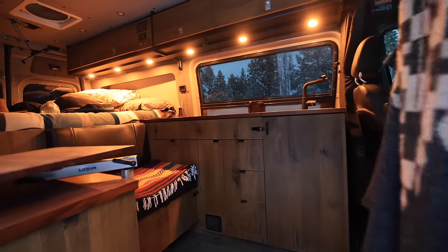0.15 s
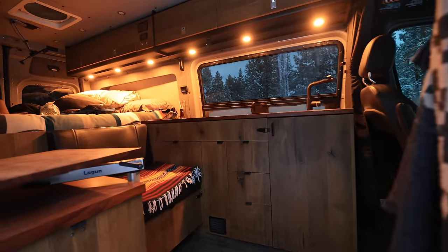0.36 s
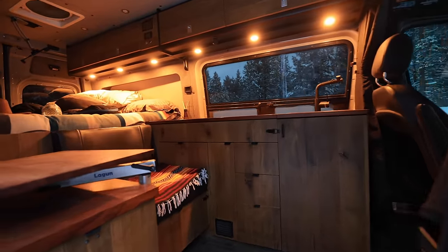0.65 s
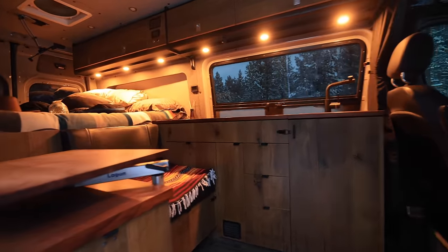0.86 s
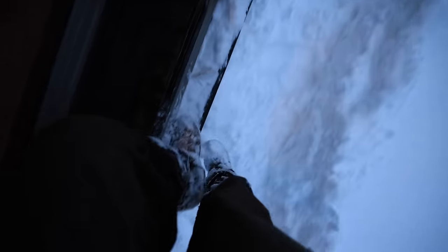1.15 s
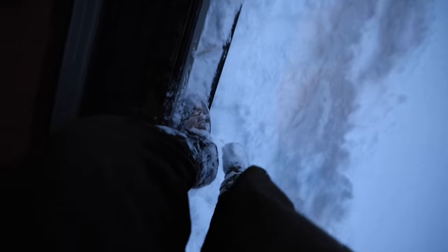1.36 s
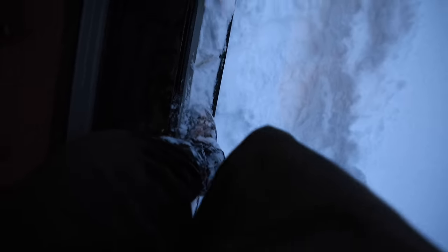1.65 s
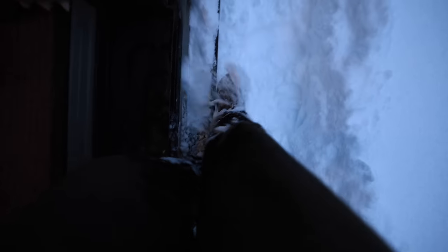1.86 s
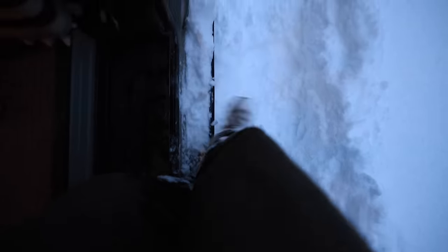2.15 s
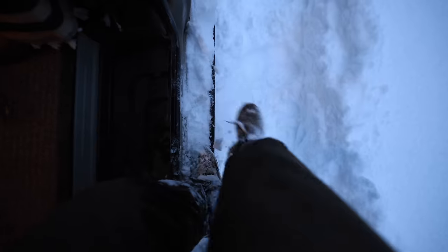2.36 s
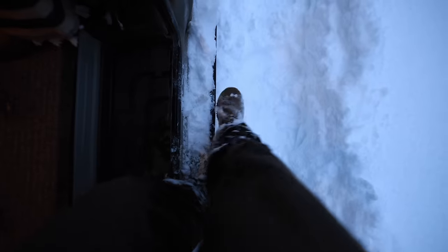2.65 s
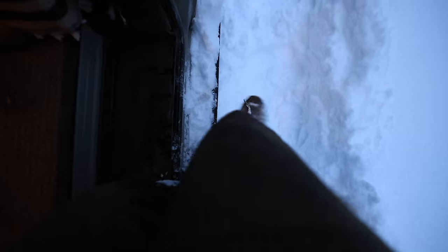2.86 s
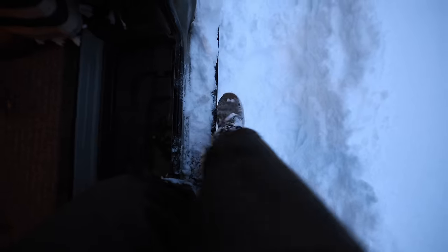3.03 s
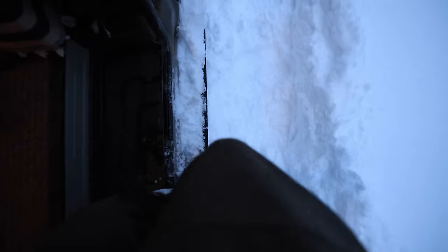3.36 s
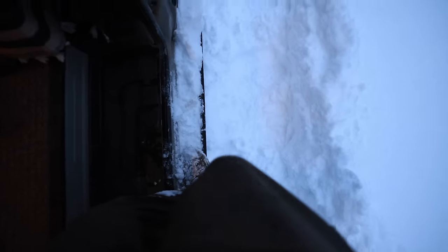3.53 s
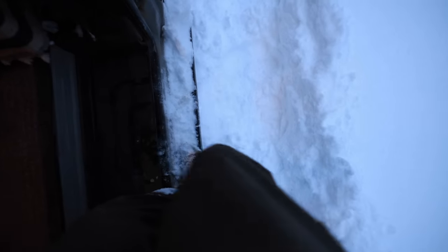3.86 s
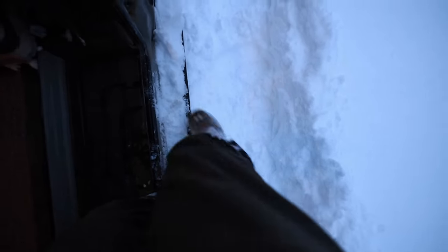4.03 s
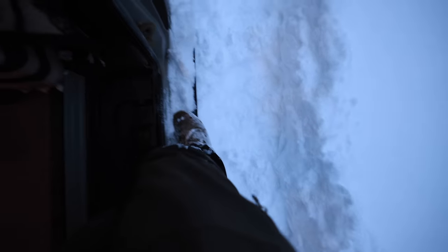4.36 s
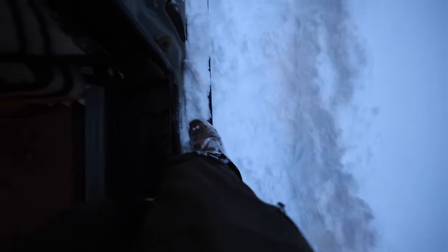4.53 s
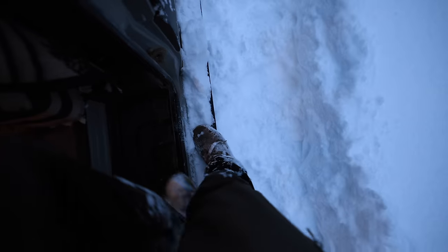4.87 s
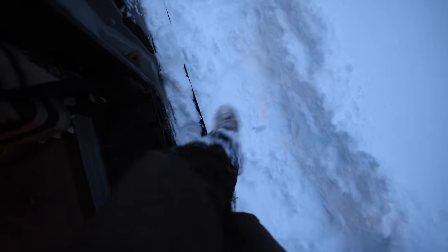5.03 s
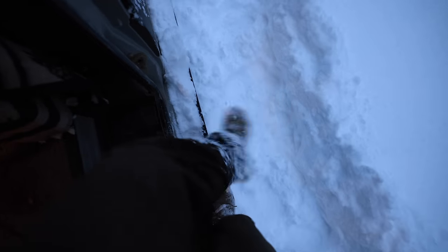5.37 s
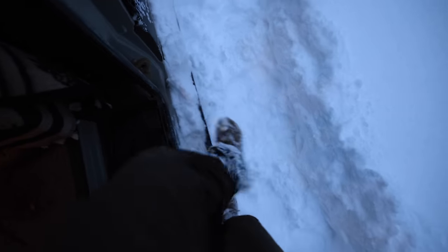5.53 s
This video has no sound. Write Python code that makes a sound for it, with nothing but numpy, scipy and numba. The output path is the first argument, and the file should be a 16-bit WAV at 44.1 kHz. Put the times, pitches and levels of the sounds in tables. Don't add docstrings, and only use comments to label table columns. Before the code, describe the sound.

Close up, heavy boots bang snow off a hollow metal van step, with cloth rustle, snowy scrapes, rapid stamps and low wind buffeting.

```python
import sys
import numpy as np
from scipy import signal
from scipy.fft import rfft, irfft
from scipy.io import wavfile
from scipy.ndimage import uniform_filter1d
from numba import njit

SR = 44100
rng = np.random.default_rng(int(sys.argv[2]) if len(sys.argv) > 2 else 0)


def invert_db(level):
    return 10 ** (np.asarray(level, dtype=float) / 20)


def pcm_store(signal):
    levels = np.round(np.clip(np.atleast_2d(signal), -1, 1) * 32767)
    wavfile.write(sys.argv[1], SR, levels.astype(np.int16).T)


N = 251370


def level(x, db):
    return x * invert_db(db) / np.sqrt(np.mean(x ** 2))


def colour(x, table):
    hz, db = np.transpose(table)
    bins_hz = np.arange(513) * SR / 1024
    log_gain = np.interp(np.log(bins_hz + 1), np.log(hz), db) * np.log(10) / 20
    cepstrum = irfft(log_gain)
    cepstrum[1:512] *= 2
    cepstrum[513:] = 0
    return signal.fftconvolve(x, irfft(np.exp(rfft(cepstrum))))[:len(x)]


def band(x, lo_hz, hi_hz):
    return signal.sosfilt(signal.butter(2, [lo_hz, hi_hz], "bandpass", fs=SR, output="sos"), x)


def walk(rate):
    hold = int(SR / rate)
    steps = np.repeat(rng.standard_normal(N // hold + 1), hold)
    smooth = uniform_filter1d(uniform_filter1d(steps, hold), hold)[:N]
    return smooth / smooth.std()


def add(out, s, x):
    i = int(s * SR)
    out[i:i + len(x)] += x[:N - i]


def blows(table, modes, tone, contact_ms, bounce_db, scatter_db, spread, swell_s, crack_s, spray_s, spray_db,
          lag_s=0):
    out, t = np.zeros(N), np.arange(SR // 3) / SR
    hz, db, t60 = np.transpose(modes)[:, :, None]
    deep, upper = hz < 150, hz > 520
    push = np.hanning(int(contact_ms * SR / 1000) + 3)
    push = np.convolve(push, np.r_[1, np.zeros(int(0.0047 * SR)), invert_db(bounce_db)])
    for s, blow_db, crack_db, deep_db, upper_db, damping in table:
        spot, detune, turn = rng.standard_normal((3, len(modes), 1))
        gain = invert_db(db + deep * deep_db + upper * upper_db + scatter_db * spot * ~deep)
        quick = max(damping, 0.2) * np.where(upper, 1.4, 1)
        fade = 1000. ** (-t * quick / t60)
        swell = 1 - np.exp(-t * hz / 200 / swell_s)
        wave = np.sin(2 * np.pi * hz * (1 + 0.0173 * detune) * t + spread * turn)
        ring = (gain * swell * fade * wave).sum(0)
        ring = band(signal.fftconvolve(ring, push), 80, 6000)
        add(out, s + lag_s, -invert_db(blow_db) * ring / abs(ring).max())

        hiss = rng.standard_normal(SR // 10)
        u = t[:len(hiss)]
        onset = 1 - np.exp(-u / 0.00083)
        decay = np.exp(-(u / crack_s) ** 2) + invert_db(spray_db) * np.exp(-u / spray_s)
        crack = colour(hiss * onset * decay, tone)
        add(out, s, invert_db(crack_db + 7.5) * crack / abs(crack).max())
    return out


# start_s, blow_db, crack_db, deep_panels_db, upper_modes_db (last two relative)
KICK_EVENTS = [
    (1.857, 3, -3.5, -8, -33),
    (2.246, 4.5, -8, -12, -5),
    (2.622, 3.5, -0.5, -31, -23),
    (2.978, 1.5, -3, -14, -44),
    (5.467, 3, -6, -14, -8),
]
# pitch_hz, level_db, t60_s
SILL_PANELS = [(92.5, -2.5, 0.46), (119.6, -11, 0.9), (152, 0.5, 0.06), (196.2, -12.5, 0.15),
               (217, -7, 0.059), (236.6, -11, 0.25), (261, -6, 0.15), (292, -3, 0.15), (305.5, -6.5, 0.11),
               (334.6, -8, 0.21), (208, 2, 0.024), (495, -2.5, 0.034), (560, 4.5, 0.027), (730, 13, 0.0065),
               (1092, -8, 0.073), (384, -4, 0.06)]
# frequency_hz, density_db
CRACK_TONE = [(300, -12), (800, 4), (2000, -1.5), (4000, -18.5), (8000, -25.5), (15000, -47)]


def kicks():
    toe = [(*kick, 0.75) for kick in KICK_EVENTS]
    return blows(toe, SILL_PANELS, CRACK_TONE, contact_ms=0.93, bounce_db=-2.5, scatter_db=1.5, spread=0.31,
                 swell_s=0.000057, crack_s=0.0015, spray_s=0.015, spray_db=-39, lag_s=0.0012)


# start_s, blow_db, crack_db, deep_panels_db (relative), damping_factor
THUD_EVENTS = [
    (0.391, -20, -53, -3, 1),
    (0.439, -17.5, -52, -6, 1.7),
    (0.549, -21, -50, -14, 1.4),
    (0.676, -26.5, -32, -11, 0.67),
    (1.307, -24.5, -35, -8, 2.6),
    (1.628, -27, -32.5, -9.5, 2.6),
    (2.222, -8, -24, 4.5, 0.86),
    (2.59, 1, -19.5, 2.5, 2.3),
    (2.596, -3, -23, 0, 1.17),
    (2.966, -0.5, -28, -4, 2.8),
]
# pitch_hz, level_db, t60_s
STEP_MODES = [(98.5, 10, 0.28), (125.2, 11.5, 0.22), (169.6, 2, 0.23), (226.8, 1, 0.29), (274, 2.5, 0.058),
              (346, -6.5, 0.15), (442, -14.5, 0.17), (542, 4.5, 0.073), (750, 9.5, 0.042), (950, -5, 0.15),
              (1190, -2.5, 0.11), (1500, -14, 0.07)]
# frequency_hz, density_db
SCUFF_TONE = [(300, 9), (800, -3), (2000, -6), (3500, -10.5), (5000, -23), (15000, -43)]


def thuds():
    sole = []
    for s, blow_db, crack_db, deep_db, damping in THUD_EVENTS:
        upper_db = -1.5 + 0.54 * (crack_db - blow_db)
        sole.append((s, blow_db, crack_db, deep_db, upper_db, damping))
    return blows(sole, STEP_MODES, SCUFF_TONE, contact_ms=0.5, bounce_db=-30, scatter_db=3.85, spread=3.13,
                 swell_s=0.0042, crack_s=0.0093, spray_s=0.027, spray_db=-16)


# start_s, blow_db, crack_db, upper_modes_db (relative), damping_factor
STAMP_EVENTS = [(3.449, -5.5, -24, 0, 1.2), (3.467, -8.5, -47, -22, 1.3), (3.487, -11, -41, -20, 0.77),
                (3.631, -11.5, -39, -11, 1.2), (3.68, -7.5, -28, -9.5, 1.36), (3.686, -4, -42, -9, 1.4),
                (3.716, -10.5, -45, -14, 1.1), (3.733, -18, -44, -23, 0.76), (5.075, -7, -35, -20, 1.3),
                (5.091, -11, -35, -20, 1.4), (5.1095, 1, -28, 0, 1.13), (5.127, 1.5, -33, -7, 1.8),
                (5.136, -3, -43, -23, 1.5), (5.155, -6.5, -42, -23, 1.2), (5.176, -16, -32, -15, 1.7),
                (5.2, -16.5, -28.5, -4, 1.1), (5.225, -27, -38, -12, 1.6), (5.258, -19, -34, -7, 2.6)]
# pitch_hz, level_db, t60_s
FLOOR_MODES = [(100.2, -0.5, 0.19), (129.6, 3.5, 0.12), (163.7, 0.5, 0.16), (201.4, 3, 0.11), (238, 1, .22),
               (283, -2.5, 0.097), (346, -5, 0.098), (445, -10, 0.055), (563, -5.5, 0.063),
               (683, 1.5, 0.037), (910, -9, 0.04), (1160, -8, 0.056)]


def stamps():
    boots = [(s, blow_db, crack_db, 0, upper_db, damping)
             for s, blow_db, crack_db, upper_db, damping in STAMP_EVENTS]
    return blows(boots, FLOOR_MODES, SCUFF_TONE, contact_ms=0.57, bounce_db=-27, scatter_db=1.4, spread=1.56,
                 swell_s=0.0016, crack_s=0.012, spray_s=0.03, spray_db=-12)


# start_s, blow_db, crack_db, upper_modes_db (relative), damping_factor
KNOCK_EVENTS = [(0.109, -13, -43, -30, 0.5), (4.241, -14.5, -29.5, -17, 0.39), (4.29, -15, -28, -25, 0.98),
                (4.311, -15, -30, -8, 1.1), (4.32, -10.5, -53, -16, 2.1), (4.342, -8, -28.5, -7, 0.87),
                (4.357, -14, -44, -19, 0.56), (4.454, -8, -30, 9, 0.72), (4.458, -3.5, -46, -5, 1.3),
                (4.467, -2, -34, -15, 1.2), (4.475, -5.5, -53, -24, 0.65)]
# pitch_hz, level_db, t60_s
TRIM_MODES = [(98, 16.5, 0.056), (200.4, -8.5, 0.11), (239, -1, 0.066), (295.4, 1.5, 0.048),
              (325, 2.5, 0.074), (418, -8, 0.046), (575, 1.5, 0.085), (720, 4, 0.053), (830, -1, 0.062),
              (1150, 3.5, 0.061), (1550, -2.5, 0.036)]


def knocks():
    heel = [(s, blow_db, crack_db, -17.5, upper_db, damping)
            for s, blow_db, crack_db, upper_db, damping in KNOCK_EVENTS]
    return blows(heel, TRIM_MODES, SCUFF_TONE, contact_ms=0.13, bounce_db=-14.5, scatter_db=0.59, spread=2.51,
                 swell_s=0.00053, crack_s=0.011, spray_s=0.027, spray_db=-1)


def bursts(table):
    out, t = np.zeros(N), np.arange(SR // 20) / SR
    for s, db, hz, t60 in table:
        burst = rng.standard_normal(len(t)) * 1000. ** (-t / max(t60, 0.002))
        tick = band(burst, 0.7 * hz, 1.4 * hz) + 0.18 * colour(burst, SCUFF_TONE)
        add(out, s, invert_db(db) * tick / abs(tick).max())
    return out


# start_s, peak_db, pitch_hz, t60_s
TICK_EVENTS = [(0.373, -25.5, 1050, 0.025), (0.58, -32, 1500, 0.033), (0.689, -46, 1290, 0.012),
               (0.876, -38, 1520, 0.012), (1.02, -33, 1360, 0.02), (1.13, -33, 1060, 0.017),
               (1.285, -34, 1000, 0.014), (1.596, -46, 1160, 0.026), (1.625, -21, 804, 0.013),
               (1.871, -26, 1120, 0.0098), (2.343, -29.5, 1480, 0.02), (2.36, -35, 800, 0.012),
               (2.535, -32, 920, 0.016), (2.561, -16, 845, 0.008), (2.777, -28.5, 1020, 0.01),
               (2.869, -32, 1400, 0.012), (2.883, -43, 1320, 0.023), (2.953, -14.5, 890, 0.025),
               (2.965, -21, 1880, 0.01), (3.091, -34, 1500, 0.018), (3.222, -30, 1650, 0.013),
               (4.034, -35.5, 3000, 0.014), (4.288, -23, 865, 0.015), (4.4, -33, 1223, 0.023),
               (4.548, -16.5, 970, 0.028), (4.999, -23, 1020, 0.015), (5.108, -9, 930, 0.0087),
               (5.127, -18, 1230, 0.0047), (5.513, -30, 1280, 0.011), (5.546, -29, 2000, 0.008)]


def ticks():
    return bursts(TICK_EVENTS)


# start_s, peak_db, pitch_hz, t60_s
GRAIN_EVENTS = [(0.3592, -26, 1480, 0.008), (0.3722, -24, 1060, 0.008), (0.4869, -30, 1590, 0.008),
                (0.5493, -24, 1430, 0.008), (0.8631, -28, 1440, 0.008), (0.8775, -25, 1520, 0.008),
                (0.9304, -29, 1240, 0.008), (1.0885, -28, 1360, 0.008),
                (3.2188, -32, 902, 0.008), (3.2228, -27, 1660, 0.008), (3.2413, -23, 1240, 0.008),
                   (3.2752, -21, 1180, 0.008), (3.3246, -21, 1090, 0.008), (3.4503, -19, 1090, 0.008),
                   (3.6169, -37, 1310, 0.008), (3.6304, -35, 926, 0.008), (3.6803, -25, 1130, 0.008),
                   (3.7312, -31, 1270, 0.008),
                (4.2273, -30, 1450, 0.008), (4.2353, -26, 1380, 0.008), (4.2872, -25, 902, 0.008),
                   (4.3096, -23, 993, 0.008), (4.344, -20, 1160, 0.008), (4.3999, -34, 1210, 0.008),
                   (4.4373, -11, 1110, 0.008), (4.4543, -9, 1170, 0.008), (4.5471, -26, 1120, 0.008),
                   (4.5476, -21, 915, 0.008), (4.8, -17, 2230, 0.008),
                (5.0773, -20, 1070, 0.008), (5.0888, -15, 1080, 0.008), (5.1043, -14, 1100, 0.008),
                   (5.1082, -12, 1020, 0.008), (5.1751, -21, 888, 0.008), (5.232, -24, 1300, 0.008),
                   (5.2624, -21, 1800, 0.008)]


def grains():
    return bursts(GRAIN_EVENTS)


# start_s, peak_db
SNAP_EVENTS = [(.02, -40), (4.0, -38.5), (5.109, -19.5), (5.128, -27), (5.514, -44), (5.546, -39),
               (5.65, -45), (1.866, -37), (1.872, -32), (2.215, -45), (3.905, -53), (4.1, -35),
               (2.252, -43), (1.8, -41), (2.343, -46), (2.361, -43), (4.548, -40), (5.272, -38),
               (3.449, -37)]


def snaps():
    out, t = np.zeros(N), np.arange(SR // 200) / SR
    for s, db in SNAP_EVENTS:
        snap = band(rng.standard_normal(len(t)) * np.exp(-t / 0.0014), 2100, 8000)
        add(out, s, invert_db(db) * snap / abs(snap).max())
    return out


def strokes(table, swell_db, edge_s, t):
    s, length, db, place, crisp_db = np.transpose(table)[:, :, None]
    gate = np.clip(np.minimum(t - s, s + length - t) / edge_s + 0.5, 0, 1)
    power = (gate * invert_db(db - swell_db * abs((t - s) / length - place))) ** 2
    return np.array([power.sum(0), (power * invert_db(crisp_db) ** 2).sum(0)])


# start_s, length_s, peak_db, peak_place (0-1), crispness_db
SCRAPE_STROKES = [(1.75, 0.12, -23.5, 0.85, 3), (2.225, 0.027, -24.5, 0.89, 4),
                  (2.596, 0.037, -22, 0.076, -5), (3.222, 0.11, -32, 0.42, -1), (3.3, 0.12, -33, 0.39, -1),
                  (3.45, 0.1, -33.5, 0.13, -6), (4.225, 0.2, -39.5, 0.2, -2.5),
                  (5.076, 0.067, -26.5, 0.41, 3), (5.125, 0.063, -34, 0.47, 0),
                  (5.176, 0.069, -33.5, 0.28, 0), (5.225, 0.051, -31, 0.85, -2)]


def scrapes(t):
    return strokes(SCRAPE_STROKES, 16, 0.014, t)


# start_s, length_s, peak_db, peak_place (0-1), crispness_db
DRAG_STROKES = [
    (4.57, 0.19, -34.5, 0.47, -2),
    (4.69, 0.15, -33.5, 0.59, 5),
    (4.77, .17, -29, 0.38, 2),
    (3.69, 0.087, -43, 0.59, -0.5),
    (6.5, 0.066, -48, 0.47, -7),
]


def drags(t):
    return strokes(DRAG_STROKES, 18, 0.06, t)


# start_s, length_s, peak_db, peak_place (0-1), crispness_db
SWISH_STROKES = [(0.0, 0.024, -32.5, .05, -5), (0.03, 0.32, -41.5, 0.47, 0.5), (0.34, 0.17, -39, 0.2, 1),
                 (0.47, 0.39, -39, 0.26, 1), (0.865, 0.079, -36.5, 0, 4), (0.93, 0.21, -39, 0.56, -1),
                 (1.13, 0.11, -43.5, 0.13, -3), (1.3, 0.64, -53, 0.26, 0.5), (1.62, 0.25, -45, 0.5, -2),
                 (1.98, 0.29, -46.5, 0.68, 3), (2.38, 0.21, -49.5, 0.36, 1), (2.73, 0.061, -44.5, 0.94, 0),
                 (2.82, 0.11, -47, 0.6, 1), (3.405, 0.042, -42, .8, 0), (3.53, 0.065, -47, .1, -2),
                 (3.94, 0.2, -57, 0.32, 3.5), (4.985, 0.21, -40, 0, -3), (5.3, 0.31, -45.5, 0.35, -5),
                 (5.54, 0.25, -45, 0.37, 4.5)]


def swishes(t):
    return strokes(SWISH_STROKES, 9.5, 0.012, t)


def fading(table, db_per_s, t):
    power = np.zeros(N)
    for s, db in table:
        rise = np.clip((t - s) / 0.0036, 0, 1)
        power += rise * invert_db(db - db_per_s * abs(t - s)) ** 2
    return power


# start_s, level_db
SPRAY_EVENTS = [
    (1.868, -32.5),
    (2.26, -33.5),
    (2.634, -29),
    (2.989, -31),
    (3.002, -39),
    (4.485, -46),
    (5.48, -43),
]


def motion(t):
    rest_db = -52.5
    spray = fading(SPRAY_EVENTS, 364, t)
    rubbing, top = swishes(t) + scrapes(t) + drags(t) + spray + invert_db(rest_db) ** 2
    rustle_db, top_db = 10 * np.log10(rubbing), 10 * np.log10(top)
    top_dip = sum((t > kick[0]) * np.exp(-abs(t - kick[0]) / 0.13) for kick in KICK_EVENTS)
    firmness_db = rustle_db - rest_db - 10
    crisp_db = top_db - rustle_db - 15 - 0.3757 * firmness_db - 14.5 * top_dip
    return rustle_db, crisp_db


def slips(rate, uneven_db):
    size = invert_db(np.minimum(uneven_db * rng.exponential(size=N), 12))
    releases = (rng.random(N) < rate / SR) * size * rng.standard_normal(N)
    return level(releases, -10.5) + level(rng.standard_normal(N), -6.5)


@njit
def resonate(x, hz, share):
    y, b, l = np.empty(len(x)), 0., 0.
    for i in range(len(x)):
        g = np.tan(np.pi * hz[i] / SR)
        v = (b + g * (x[i] - l)) / (1 + g * (g + share))
        b, l, y[i] = 2 * v - b, l + 2 * g * v, share * v
    return y


def region(x, centres_hz, k):
    place = np.log(np.arange(N // 2 + 1) * SR / N + 1)
    gain = np.interp(place, np.log(centres_hz), np.eye(len(centres_hz))[k])
    return irfft(rfft(x) * gain, N)


# frequency_hz, density_db
RUSTLE_TONE = [(180, -26), (300, -16.5), (700, -2), (868, -2), (1270, -2), (1690, -4.5), (2640, -7),
               (3330, -7), (5480, -21.5), (14400, -36.5), (15900, -33)]
# time_s, pitch_hz
FOLD_PITCH = [(0, 1160), (.42, 1500), (.6, 1720), (.7, 1010), (.88, 1550), (1.12, 1390), (2.8, 1030),
              (3.35, 1150), (3.5, 1890), (4.2, 1180), (4.62, 2260), (4.83, 1880), (4.93, 1500), (5.1, 2320),
              (5.27, 1430)]


def rustle(t):
    rustle_db, crisp_db = motion(t)
    fold_hz = np.interp(t, *np.transpose(FOLD_PITCH))
    centres_hz = np.array([450, 700, 1100, 1700, 2600, 3800, 5600])
    parts = []
    for k, centre_hz in enumerate(centres_hz):
        tilt_db = -1 * np.log2(fold_hz / 1450) * np.log2(centre_hz / 1700)
        part = region(colour(slips(1500, 3.0), RUSTLE_TONE), centres_hz, k)
        parts.append(part * invert_db(1.13 * walk(70) + tilt_db))
    fold = resonate(slips(900, 0.93), fold_hz * (1 + 0.028 * walk(40)), 0.2)
    body = (level(sum(parts[:-1]), 0.19) + level(fold, -6.0)) * invert_db(1.4 * walk(80))
    return body * invert_db(rustle_db) + level(parts[-1], 0.54) * invert_db(rustle_db + crisp_db)


def crunch(t):
    press = np.sqrt(scrapes(t)[0] + drags(t)[0])
    size = invert_db(np.minimum(4.8 * rng.exponential(size=N), 15))
    crushed = (rng.random(N) < 500 / SR) * size * rng.standard_normal(N)
    return level(resonate(crushed, 1900 * invert_db(2.9 * walk(150)), 0.33), -9) * press


# time_s, length_s, level_db
WHISK_EVENTS = [
    (.885, .03, -60),
    (1.04, 0.048, -54.5),
    (1.115, .02, -57),
    (5.11, .03, -68),
    (5.26, .03, -58),
]


def whisks(t):
    puffs = sum(invert_db(db) * np.exp(-((t - s) / length * 2) ** 2) for s, length, db in WHISK_EVENTS)
    return level(band(slips(2500, 2.2), 10500, 15500), 0.1) * puffs


# start_s, peak_db, lower_mode_db (relative)
GLINT_EVENTS = [(0.8844, -49, -7), (2.558, -44, 2), (2.9357, -57, 1), (2.9646, -36, -11), (3.1074, -59, -8),
                (3.2151, -48, -7), (3.3892, -39, -3), (2.956, -52, 6), (3.723, -50, -10)]
TAB_MODES_HZ = 10550, 7650


def glints():
    out, t = np.zeros(N), np.arange(SR // 20) / SR
    high_hz, low_hz = TAB_MODES_HZ
    for s, db, lower_db in GLINT_EVENTS:
        ring = np.sin(2 * np.pi * high_hz * t) + invert_db(lower_db + 1) * np.sin(2 * np.pi * low_hz * t)
        add(out, s, invert_db(db) * ring * np.exp(-t / 0.0028) * (1 - np.exp(-t / 0.0005)))
    return out


# start_s, level_db
SWAY_EVENTS = [(0.357, -30), (1.6, -43), (1.72, -43), (2.48, -38), (2.561, -43.5), (4.537, -34),
               (4.901, -37), (5.02, -39), (5.235, -28.5), (5.37, -51), (5.45, -36), (5.56, -37)]


def body_rumble(t):
    shudder = fading(SPRAY_EVENTS, 229, t) + fading(SWAY_EVENTS, 229, t)
    shake = swishes(t)[0] * invert_db(2.5) ** 2 + scrapes(t)[0] * invert_db(-2) ** 2 + drags(t)[0] * invert_db(-4) ** 2
    shake = shake + shudder * invert_db(3.5) ** 2 + invert_db(-48.5) ** 2
    lumps = band(rng.standard_normal(N), 73, 640) * invert_db(2.2 * walk(30))
    return level(lumps, 0.12) * np.sqrt(shake)


# peak_s, peak_db
GUST_EVENTS = [(0.0, -27), (.32, -26.5), (.6, -28), (.76, -28), (.87, -28), (1.19, -32), (1.36, -35.5),
               (1.52, -33), (1.87, -45), (2.13, -32.5), (2.32, -35), (2.67, -46), (2.98, -50), (3.14, -40),
               (3.35, -35), (3.47, -48), (4.45, -42), (4.76, -34.5), (5.06, -30.5), (5.18, -40),
               (5.48, -29), (5.65, -37)]


def wind(t):
    s, db = np.transpose(GUST_EVENTS)[:, :, None]
    slope_db_per_s = np.where(t < s, 186, 144)
    gusts = invert_db(db - slope_db_per_s * abs(t - s))
    buffeting = band(band(rng.standard_normal(N), 39.8, 63.2), 35, 150)
    return level(buffeting, 0.055) * np.maximum(gusts.max(0), invert_db(-47))


# time_s, level_db
WHINE_LEVEL = [(0, -56), (1.6, -47.5), (2.4, -60), (4.1, -53), (5.7, -72)]


def heater_whine(t):
    return invert_db(np.interp(t, *np.transpose(WHINE_LEVEL)) + 0.5) * np.sin(2 * np.pi * 751 * t)


# frequency_hz, density_db
HUSH_TONE = [(35, -57), (60, -5), (108, 18.5), (538, 2.5), (680, -37), (746, -27.5), (819, -9), (1030, -15),
             (3730, -6), (5180, -30.5), (15900, -25)]


def outdoor_hush():
    return level(colour(rng.standard_normal(N), HUSH_TONE), -48)


def scene():
    t = np.arange(N) / SR
    boots = kicks() + thuds() + stamps() + knocks()
    snow = ticks() + grains() + snaps() + crunch(t)
    clothes = rustle(t) + whisks(t) + glints()
    background = body_rumble(t) + wind(t) + heater_whine(t) + outdoor_hush()
    return (boots + snow + clothes + background)[None]


def top_cut(x):
    return signal.sosfilt(signal.butter(12, 16020, fs=SR, output="sos"), x)


def record(dry):
    recover = np.exp(-1 / (0.06 * SR))
    loudness = signal.lfilter([1 - recover], [1, -recover], dry ** 2)
    coupled = signal.sosfilt(signal.butter(1, 22.5, "highpass", fs=SR, output="sos"), dry)
    held = coupled / np.sqrt(1 + loudness / invert_db(-21) ** 2) ** 0.17
    return top_cut(np.clip(held, -0.99, 0.99))


dry = scene()
out = record(dry)
pcm_store(out)
```